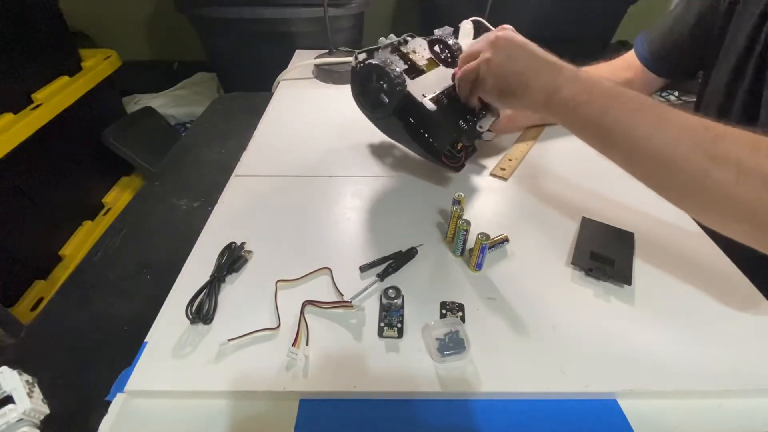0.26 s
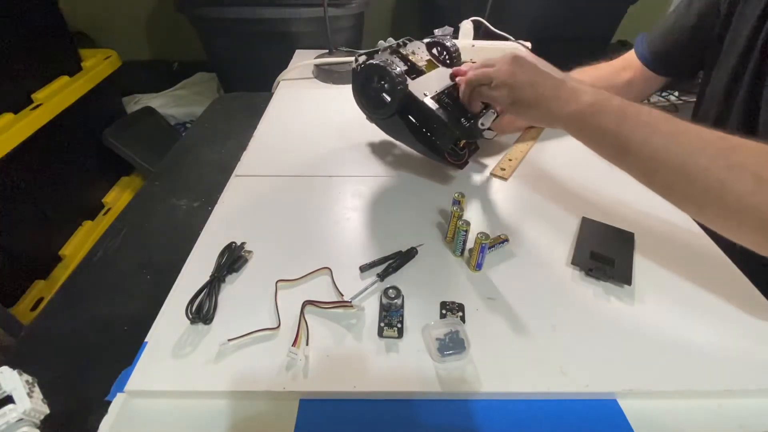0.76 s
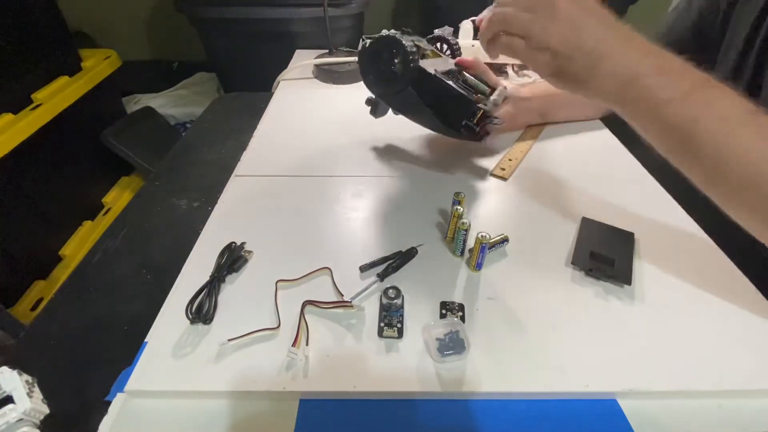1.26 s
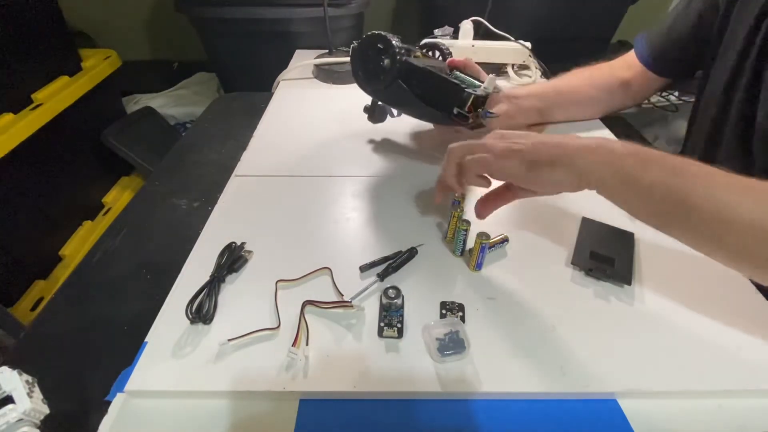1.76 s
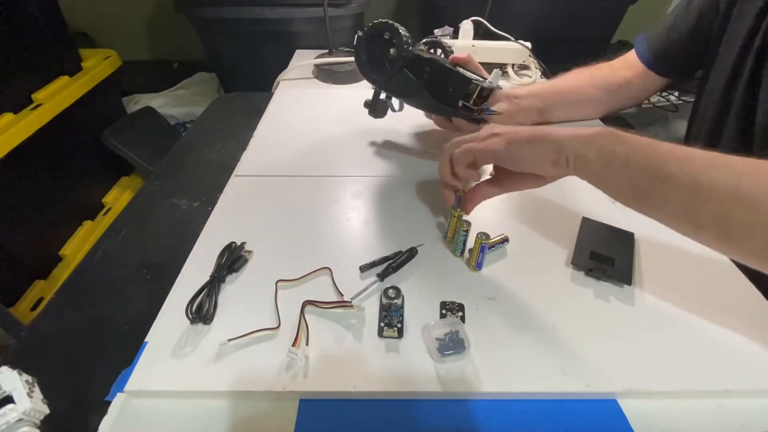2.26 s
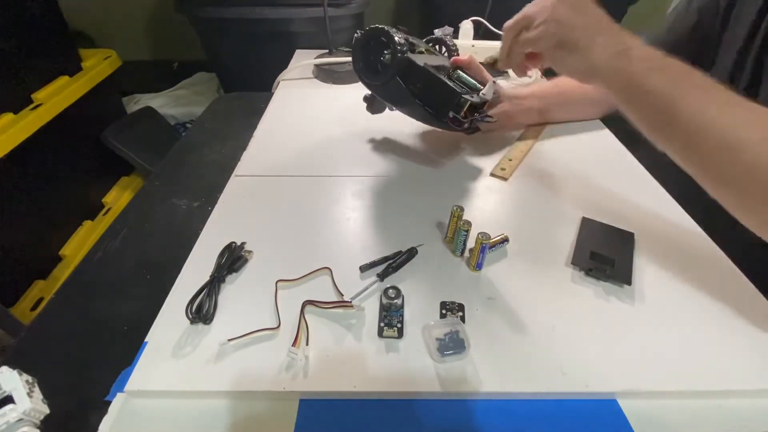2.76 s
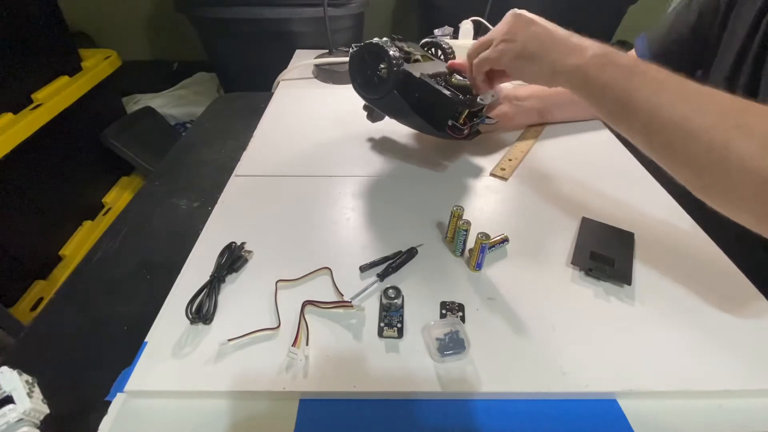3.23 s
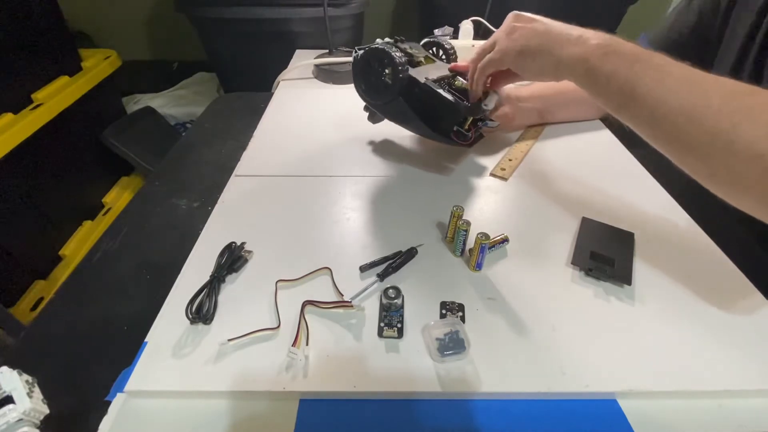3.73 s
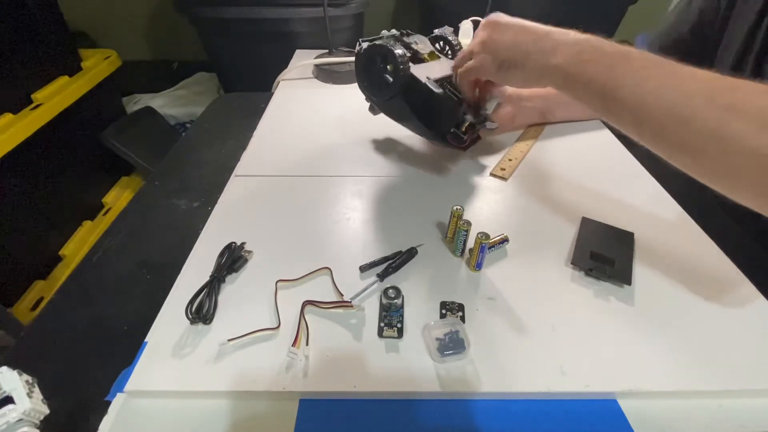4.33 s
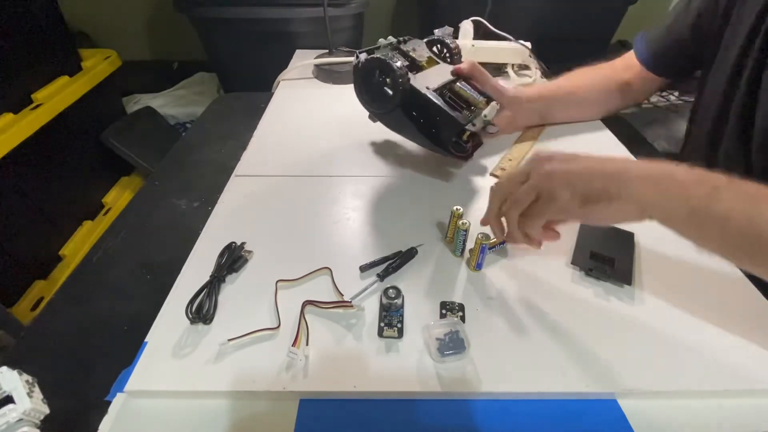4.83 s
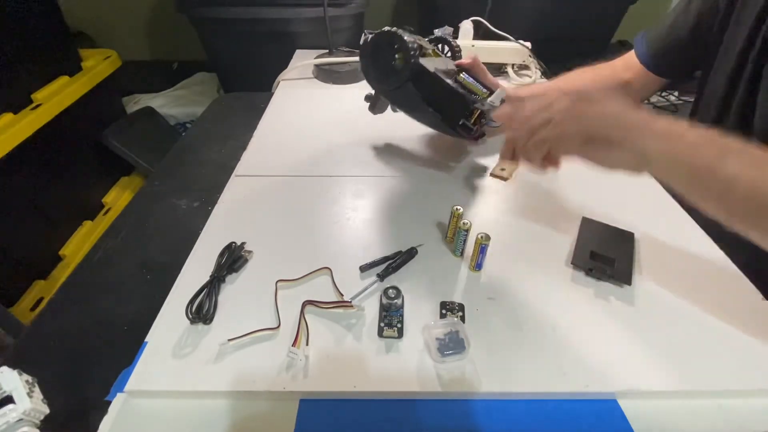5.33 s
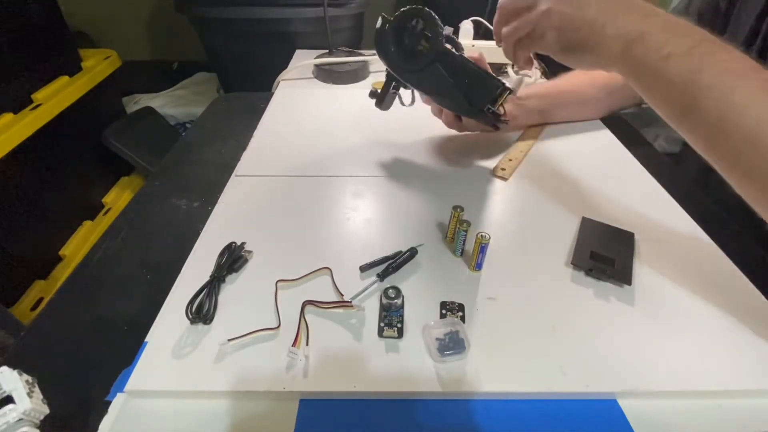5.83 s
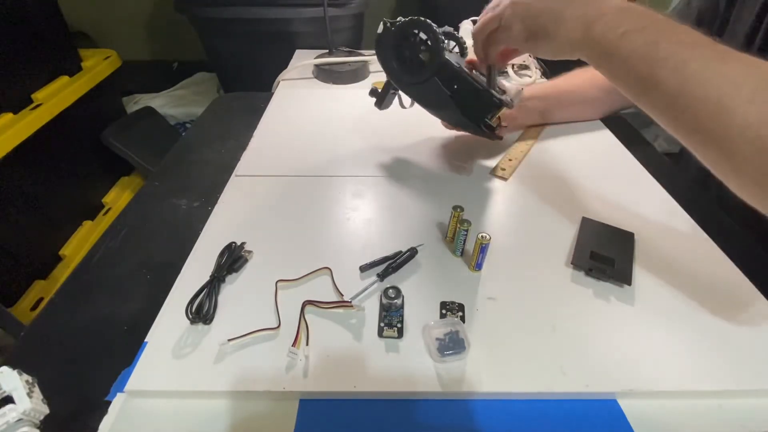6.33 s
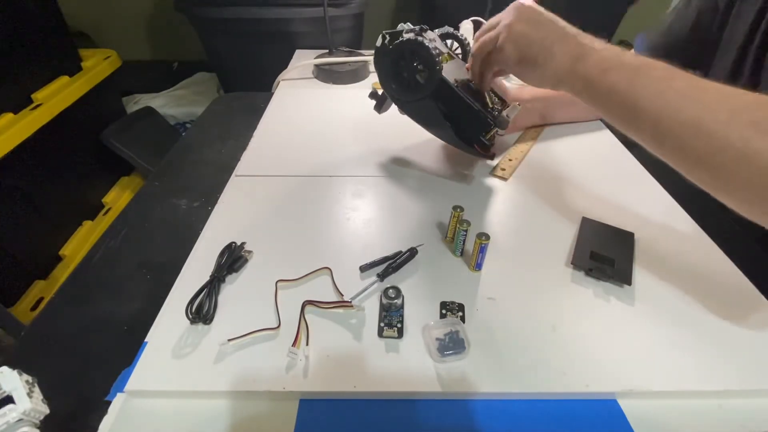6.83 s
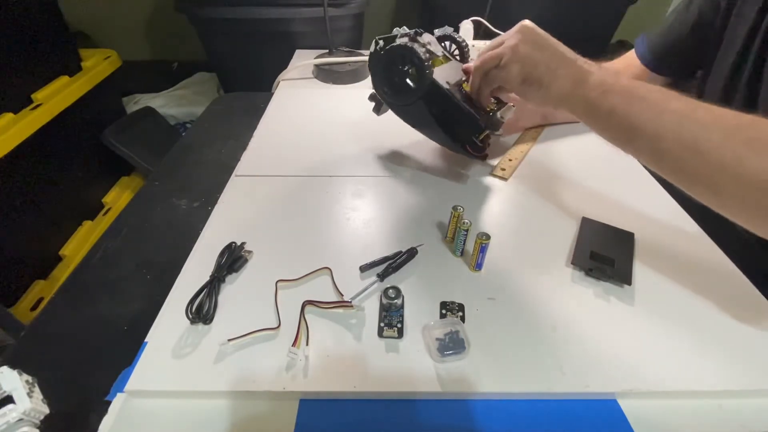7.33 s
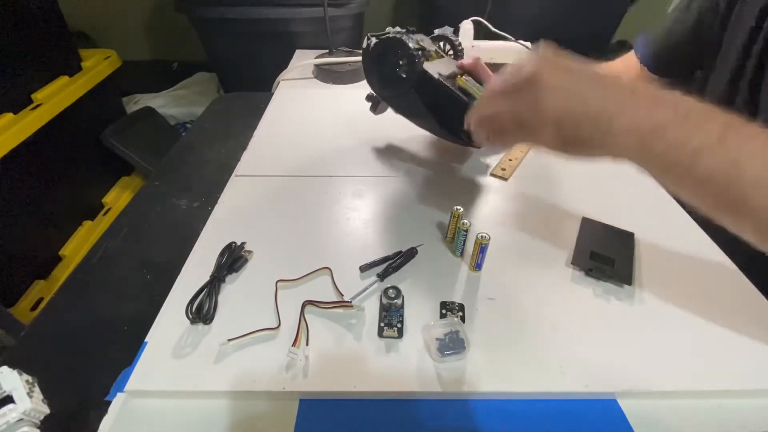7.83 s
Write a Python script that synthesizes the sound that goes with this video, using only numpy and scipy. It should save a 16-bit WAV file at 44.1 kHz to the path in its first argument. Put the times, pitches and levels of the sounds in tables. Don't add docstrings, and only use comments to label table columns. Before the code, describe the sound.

Batteries snap sharply into a small plastic robot shell in uneven bursts, over a steady low compressor hum and faint night insects.

```python
import sys
import numpy as np
from scipy import signal
from scipy.fft import rfft, irfft, next_fast_len
from scipy.io import wavfile
from scipy.ndimage import uniform_filter1d

SR = 44100
rng = np.random.default_rng(int(sys.argv[2]) if len(sys.argv) > 2 else 0)


def master(y):
    cut = np.clip(np.atleast_2d(y).T, -1, 1)
    pcm = np.round(cut * 32767)
    wavfile.write(sys.argv[1], SR, pcm.astype(np.int16))


def nominal_scale(level):
    x = np.asarray(level, float) / 20
    return 10 ** x


N = 356621
T = np.arange(N) / SR


def curve(table, hz):
    f, v = np.transpose(table)
    return np.interp(np.log(np.maximum(hz, 1)), np.log(np.maximum(f, 1)), v)


def level(x, db):
    return x * nominal_scale(db) / np.sqrt(np.mean(x ** 2))


def spread(x, pan_db):
    return np.array([x * nominal_scale(pan_db / 2), x * nominal_scale(-pan_db / 2)])


def add(out, x, s):
    i = int(s * SR)
    out[..., i:i + x.shape[-1]] += x[..., :N - i]


def noise(gain):
    size = next_fast_len(N)
    hz = np.arange(size // 2 + 1) * SR / size
    return irfft(rfft(rng.standard_normal(size)) * gain(hz), size)[:N]


def walk(rate, size=N):
    k = int(SR / rate)
    held = np.repeat(rng.standard_normal(size // k + 1), k)
    return 1.24 * uniform_filter1d(uniform_filter1d(held, k), k)[:size]


def causal(db):
    c = irfft(db * np.log(10) / 20)
    c[1:len(c) // 2] *= 2
    c[len(c) // 2 + 1:] = 0
    return irfft(np.exp(rfft(c)))


def ring(hz, t60, t):
    return np.sin(2 * np.pi * hz * t) * np.exp(-np.log(1000) * t / t60)


def knocks(table, rise_cycles, grip=1, grip_db=0):
    out, t = np.zeros(N), np.arange(SR // 3) / SR
    for s, db, hz, t60 in table:
        swell = 1 - np.exp(-t * hz / rise_cycles)
        add(out, nominal_scale(db + grip_db) * ring(hz, t60 * grip, t) * swell, s)
    return out


def air():
    # (frequency [Hz], level [dB per Hz])
    air_spectrum = [(15, -42.5), (25, -17), (44, -11.5), (74, -19.5), (102, -11), (123, -9.5), (145, -17),
                    (170, -12.5), (427, -17.5), (775, -26.5), (1130, -24), (1940, -31), (3720, -37),
                    (5570, -49.5), (16000, -73)]
    # (frequency [Hz], left minus right [dB])
    air_pan = [(60, 3), (110, 1), (200, -3), (380, -4), (700, 0), (1290, 5), (2380, 2.5), (4400, 10.5),
               (8120, 3), (15000, -3.5)]
    out, swell = 0, walk(0.66)
    for mid_hz in 25 * 2 ** np.arange(0, 9.6, .5):
        def band(hz):
            octaves_off = np.clip(np.log2((hz + 1) / mid_hz), -.5, .5)
            return nominal_scale(curve(air_spectrum, hz)) * np.cos(np.pi * octaves_off)
        common, left, right = (noise(band) for _ in range(3))
        alike = np.clip(150 / mid_hz - .2, 0, .6)
        pair = np.sqrt(alike) * common + np.sqrt(1 - alike) * np.array([left, right])
        drift = nominal_scale(1.0 * swell + 0.44 * walk(16))
        out = out + pair * spread(drift, curve(air_pan, mid_hz))
    return level(out, -56)


def hum_tone(phase, db, pan_db, lead):
    pair = np.array([nominal_scale(pan_db / 2) * np.sin(phase + lead), nominal_scale(-pan_db / 2) * np.sin(phase)])
    return np.sqrt(2) * nominal_scale(db) * pair


def compressor():
    shaft_hz, mains_hz, wobble_hz = 58.74, 120.0, 1.8
    # (multiple of shaft speed, rms level [dB], left minus right [dB], left leads by [rad])
    shaft_tones = [(1, -55.5, 8, -0.62), (2, -78.5, -1, 0), (3, -75.5, -3.5, .3), (5, -77, -6.5, .5),
                   (6, -77, -1.5, 0.3), (7, -72.5, 1.5, .5)]
    # (time [s], frequency [Hz], level [dB])
    pipe_whine = [
        (0, 268.2, -63),
        (1.501, 272.1, -70),
        (3, 274, -77),
        (6, 270.5, -72.5),
        (8.1, 269, -66.5),
    ]
    load = np.sin(2 * np.pi * wobble_hz * T)
    out = hum_tone(2 * np.pi * mains_hz * T + .12 * load, -47, -1, -0.13) * (1 + .06 * load)
    for k, db, pan_db, lead in shaft_tones:
        unsteady_db = db + 0.15 * k * walk(4.9)
        out += hum_tone(2 * np.pi * k * shaft_hz * T + k, unsteady_db, pan_db, lead)
    s, hz, db = np.transpose(pipe_whine)
    whine_phase = 2 * np.pi * np.cumsum(np.interp(T, s, hz)) / SR
    return out + hum_tone(whine_phase, np.interp(T, s, db) + 2 * walk(12), -5.0, 1.0)


def katydid():
    # (time of second stroke [s], level [dB], accent on third stroke [dB])
    phrases = [
        (0.2377, -59.5, 4.5),
        (1.224, -63.5, 7.5),
        (2.196, -59, -0.5),
        (3.231, -58, 0.5),
        (4.1544, -58, -1),
        (5.073, -60, 3),
        (6.0196, -58, -2.5),
        (7.015, -56.5, -1.5),
        (7.9815, -60, 0.5),
    ]
    # (time after second stroke [s], level [dB], share of the accent)
    phrase_strokes = [
        (-.047, -5, 0),
        (0, 2, 0),
        (.065, 2.5, 1),
        (.149, 2, .4),
    ]
    stroke_hz, scatter_db = 4250, -0.3
    out, t = np.zeros(N), np.arange(2048) / SR
    for s, phrase_db, accent_db in phrases:
        for after, more_db, share in phrase_strokes:
            if s + after >= T[-1]:
                continue
            pitch_luck, level_luck = rng.standard_normal(2)
            hz = stroke_hz * (1 + 0.01 * pitch_luck)
            db = phrase_db + more_db + share * accent_db + scatter_db * level_luck
            phase = 2 * np.pi * np.cumsum(hz * (1.03 - 2.8 * t)) / SR
            stroke = np.sin(phase) * np.sin(np.pi * np.clip(t / .026, 0, 1)) ** 2
            add(out, nominal_scale(db - 7) * stroke, s + after - .009)
    echo = level(noise(lambda hz: hz), -27)[:9000] * np.exp(-T[:9000] / 0.097)
    return out + signal.fftconvolve(out, echo)[:N]


def cricket():
    # (time [s], rms level [dB])
    trills = [(.12, -73), (.55, -77), (0.979, -78.5), (1.42, -74.5), (1.84, -76), (2.26, -74), (2.71, -75),
              (3.16, -71.5), (3.63, -81), (4.14, -74), (4.6, -75.5), (5.04, -74), (5.501, -76),
              (5.96, -75.5), (6.41, -72), (6.84, -70.5), (7.28, -76), (7.71, -76)]
    loudness, t = np.zeros(N), T[:SR // 3]
    for s, db in trills:
        swell = np.clip(t / .02, 0, 1)
        fade = np.exp(-np.maximum(t - .16, 0) / 0.037)
        add(loudness, nominal_scale(db) * swell * fade, s)
    song = level(noise(lambda hz: np.exp(-((hz - 3230) / 230) ** 2)), 0)
    flutter = 1 + 0.28 * np.sin(2 * np.pi * 45 * T)
    return song * loudness * flutter


def insects():
    chorus = level(noise(lambda hz: np.exp(-((hz - 3806) / 45) ** 2)), -82.5) * nominal_scale(0.83 * walk(2))
    return spread(katydid(), 10.2) + spread(cricket(), 4) + spread(chorus, 4)


def drag(width=0.4):
    start_s, length_s, mid_hz, drag_db = 4.35, 1.1, 337, -62.5
    out, size = np.zeros(N), int(length_s * SR)
    rumble = noise(lambda hz: np.exp(-(np.log((hz + 1) / mid_hz) / width) ** 2))
    rumble = rumble * nominal_scale(2.1 * walk(14.4))
    add(out, level(rumble[:size], drag_db) * np.hanning(size) ** .5, start_s)
    return out


def slides(split_hz=7300, ridge_hz=6100, ridge_db=3.5):
    # (time [s], length [s], fine hiss [dB], fade over the slide [dB], rub over hiss [dB])
    slide_moves = [(0.0, .05, -78.5, -23, 15.5), (0.057, .06, -80, -18, -5),
                   (0.461, 0.019, -78, 16.5, 15.5), (0.83, 0.0082, -84, 35, 6), (2.88, 0.045, -79.5, -5, 6),
                   (2.936, 0.1, -78.5, 8, 6.5), (3.477, 0.12, -85, -12.5, 6), (3.848, 0.026, -80, -3, 9),
                   (3.888, 0.01, -73.5, 3.5, 15), (3.714, 0.011, -61, 3, 15),
                   (4.441, 0.094, -75, -4.5, -17), (4.551, 0.67, -72.5, -13, 0.5),
                   (5.355, 0.053, -79, -12, 1), (6.35, .07, -89, -19, 3), (6.47, .03, -83.5, -6, 9),
                   (7.21, 0.026, -81, 14.5, 10), (7.37, 0.078, -79.5, 2, 7), (7.474, .19, -73, -20, 3.5),
                   (7.684, 0.26, -88, 7, 2.5)]
    # (frequency [Hz], level [dB per Hz])
    skin_spectrum = [(880, -24), (1500, 0), (1890, -15), (2210, 3.5), (2900, -10.5), (3200, -5.5),
                     (3990, -5), (6070, -3), (8350, -11), (10200, -4), (11200, -7), (12200, -29),
                     (13000, -15), (14500, -9.5), (16300, -51.5)]
    lift_db_per_s = -260

    def is_fine(hz):
        return (hz > split_hz) & (hz < 12000)

    def rub_gain(hz):
        ridge = ridge_db * np.exp(-((hz - ridge_hz) / 200) ** 2)
        return nominal_scale(curve(skin_spectrum, hz) + ridge) * ~is_fine(hz)

    fine, coarse = np.zeros((2, N))
    for s, length, db, fade_db, rub_db in slide_moves:
        t = T[:int((length + .2) * SR)]
        moving_db = db + fade_db * np.minimum(t / length, 1)
        press = nominal_scale(moving_db + lift_db_per_s * np.maximum(t - length, 0))
        add(fine, press, s)
        add(coarse, press * nominal_scale(rub_db), s)
    hiss = level(noise(lambda hz: nominal_scale(curve(skin_spectrum, hz)) * is_fine(hz)), 0)
    rub = level(noise(rub_gain), 2.5)
    soft_fine, soft_coarse = uniform_filter1d([fine, coarse], size=661, axis=1)
    uneven = nominal_scale(1.0 * walk(45) + 1.8 * walk(17))
    return spread((soft_fine * hiss + soft_coarse * rub) * uneven, 2.2)


def table_knocks():
    # (time [s], peak level [dB], frequency [Hz], 60 dB decay [s])
    dull_knocks = [(4.445, -54, 256, 0.065), (4.445, -59, 670, 0.03), (4.581, -61, 332, 0.3),
                   (4.96, -53, 481, 0.034), (5.119, -52.5, 472, 0.056), (5.121, -53, 920, 0.07),
                   (5.133, -57, 934, 0.072), (5.126, -66, 1140, .03), (4.971, -60.5, 1020, 0.089),
                   (6.859, -66, 59.7, 0.21), (7.031, -44, 62.2, 0.19), (7.22, -46, 47.3, 0.22),
                   (7.28, -40, 52, 0.27)]
    return spread(knocks(dull_knocks, 0.21), 2.5)


def squeaks(width=0.02):
    # (time [s], length [s], frequency [Hz], level [dB])
    narrow_squeaks = [(3.03, .08, 5370, -63), (3.022, .045, 2520, -63), (3.04, .06, 7000, -73),
                      (5.10, .06, 2420, -74), (1.95, .04, 5700, -83), (2.26, .06, 6550, -87),
                      (.822, .02, 6400, -65), (4.56, .4, 6100, -80), (2.866, .05, 2450, -58),
                      (2.866, .04, 3450, -63), (6.41, .04, 2300, -66), (6.465, .04, 2300, -67)]
    out = np.zeros(N)
    for s, length, mid_hz, db in narrow_squeaks:
        size = int(length * SR)
        rasp = noise(lambda hz: np.exp(-((hz / mid_hz - 1) / width) ** 2))[:size]
        add(out, level(rasp, db) * np.hanning(size) ** .5, s)
    return out


def contact(peak_db, body_db, metal_db, free_hz, chatter_ms, shell_db=-21, loudest_db=5):
    # (frequency [Hz], level [dB per Hz])
    crack_spectrum = [(150, -41), (250, -5), (560, -4.5), (950, -2), (1550, -5), (2040, -7.5), (2600, -2.5),
                      (3150, -6), (3690, -6), (4710, -7.5), (6120, -5), (7170, -11), (11100, -13),
                      (11900, -23), (13900, -11), (15500, -18.5), (16300, -46)]
    # (frequency [Hz], level [dB], 60 dB decay [s])
    shell_modes = [(442, -6, 0.013), (627.5, -6.5, 0.016), (890, -8.5, 0.02), (1160, -6, 0.09),
                   (1422, -4, 0.04), (1590, -15, 0.012), (1710, -2, 0.022), (2280, -18, .03),
                   (2335, -3, 0.021), (2500, -7.5, 0.041), (2660, -16, 0.017), (3080, -4, 0.0022),
                   (3330, -9.5, 0.075), (3390, -11.5, 0.031), (4280, -15.5, 0.023), (4750, -8.5, 0.042),
                   (5200, -9.5, .025), (5720, -16, .015), (6570, -10.5, 0.019), (7100, -9.5, 0.013)]
    t, hz = np.arange(4096) / SR, np.arange(2049) * SR / 4096
    f, db, t60 = (c[:, None] for c in np.transpose(shell_modes))
    t60 = np.minimum(t60, 50 / f + .008)

    chatter_s = np.clip(chatter_ms, .5, -1.2 - .35 * peak_db) / 1000
    u = t[:1024] / chatter_s
    luck = rng.standard_normal(1024)
    blows = luck * np.abs(luck)
    blows = rfft(blows * np.minimum(u * 1.1, 1) * np.exp(-u), 4096)
    patchy_db = 14 * np.log10(np.abs(blows) + 1e-3)
    blows = irfft(blows / rfft(causal(patchy_db)))
    blows = blows / np.sqrt(np.sum(blows ** 2))

    tilt = [(800, body_db + 7.5), (2500, 0.00072), (8000, metal_db + 12.5), (14000, 1.6 * metal_db + 25.5)]

    def held_db(at):
        free = np.exp(-(np.log((at + 1) / free_hz) / .2) ** 2)
        return curve(tilt, at) + loudest_db * free

    grip_db = 3 * rng.standard_normal(f.shape)
    drift = .02 * rng.standard_normal(f.shape)
    body = np.sum(nominal_scale(db + held_db(f) + grip_db) * ring(f * (1 + drift), t60, t), axis=0)
    crack = causal(curve(crack_spectrum, hz) + held_db(hz))
    hit = nominal_scale(shell_db) * body + crack / np.abs(crack).max()
    hit = hit * nominal_scale(peak_db - 4.5) / np.sqrt(np.sum(hit ** 2)) * 4
    no_bass = signal.butter(4, 480, "high", fs=SR, output="sos")
    return signal.sosfilt(no_bass, signal.fftconvolve(blows, hit))


def ringing_parts():
    # (time [s], peak level [dB], frequency [Hz], 60 dB decay [s])
    part_rings = [(0.470, -31, 2640, .04), (0.471, -23, 3600, 0.032), (0.472, -29, 1086, .05),
                  (0.478, -32, 2340, .04), (0.642, -45, 2220, 0.033), (0.643, -44, 3400, .04),
                  (0.842, -16, 1700, 0.037), (0.848, -24, 1570, 0.053), (0.842, -24, 2216, 0.066),
                  (0.842, -21, 1394, 0.057), (0.842, -19, 2660, 0.039), (0.842, -23, 3650, 0.035),
                  (0.850, -30, 3220, .04), (2.864, -46, 4700, 0.024), (2.864, -48, 3520, 0.055),
                  (2.864, -40.5, 1150, 0.052), (2.994, -56, 3400, 0.036), (3.118, -39, 2220, 0.035),
                  (3.118, -38, 5360, .04), (3.128, -36, 1950, .06), (3.729, -23, 2580, .03),
                  (3.729, -25, 1870, .05), (3.729, -28, 4670, .04), (3.736, -24.5, 1120, 0.041),
                  (3.742, -31, 2350, 0.035), (3.900, -36, 2380, .035), (3.902, -36, 3350, .05),
                  (4.300, -53, 4680, .03), (4.304, -54, 3230, .04), (6.246, -43.5, 3350, .05),
                  (6.253, -41, 1000, 0.055), (6.286, -32.5, 3330, .05), (6.288, -50, 5450, .05),
                  (6.292, -34.5, 953, 0.056), (6.319, -44, 3280, .03), (6.522, -44, 2250, .05),
                  (6.654, -43, 3290, 0.053), (7.237, -27.5, 1710, 0.044), (7.237, -26, 2920, 0.023),
                  (7.238, -31, 1135, .05), (7.238, -29, 5100, .025), (7.244, -30, 4280, 0.035),
                  (7.238, -28.5, 755, 0.051), (0.843, -24, 1080, 0.052)]
    return knocks(part_rings, 1.1, grip=0.61)


def bumps():
    # (time [s], strength [dB], metal brightness [dB], freest resonance [Hz], chatter [ms])
    case_bumps = [(0.0014, -39, -22, 1390, 4.3), (0.165, -28.5, -26, 1500, 4.7),
                  (1.9394, -47.5, -25, 1300, 3.8), (3.2928, -35, -15.5, 2400, 4.3),
                  (4.2965, -38, -18, 2600, 2.7), (4.304, -35.5, -18, 1000, 6.3),
                  (6.2446, -26.5, -23, 2580, 2.3), (6.2535, -33.5, -28, 2290, 3.5),
                  (5.128, -43, -32, 2420, 5), (6.9276, -32, -21, 990, 5), (7.0627, -33.5, -14, 2960, 4.2),
                  (7.4783, -35.5, -37, 2400, 4.3)]
    out = np.zeros(N)
    for s, db, metal_db, free_hz, chatter_ms in case_bumps:
        add(out, contact(db, -6.5, metal_db, free_hz, chatter_ms), s)
    return out


def ticks():
    # (time [s], strength [dB], metal brightness [dB], freest resonance [Hz], chatter [ms])
    spring_ticks = [(0.0574, -50, -5, 1880, 4), (0.116, -34, -18, 4780, 4), (2.863, -27, -31, 2430, 2.6),
                    (2.871, -33.5, -35, 2400, 4), (2.9394, -41.5, 6, 5300, 4),
                    (2.9935, -35.5, -11, 3330, 3), (3.0344, -38, -14, 5340, 4),
                    (3.499, -49.5, -14, 1060, 4.8), (6.2856, -19, -20, 2283, 2.03),
                    (6.2925, -29, -15, 2150, 4.2), (6.3182, -29, -23, 2250, 2), (6.4102, -40, -46, 2220, 5),
                    (6.4722, -43, -23, 2230, 4.3), (6.5124, -31, -16, 3360, 3),
                    (6.5212, -23, -15.5, 2340, 4), (6.5916, -32, -7, 5570, 4),
                    (6.6537, -25.5, -20.5, 3300, 2.5), (6.8083, -43.5, -34, 2360, 4),
                    (6.818, -46.5, -25, 2500, 5.4), (6.8308, -41, -24, 1070, 4),
                    (6.8418, -33.5, -25.5, 2760, 4.6)]
    out = np.zeros(N)
    for s, db, metal_db, free_hz, chatter_ms in spring_ticks:
        add(out, contact(db, -19, metal_db, free_hz, chatter_ms), s)
    return out


def snaps():
    # (time [s], strength [dB], body weight [dB], metal brightness [dB], freest resonance [Hz])
    seating_blows = [(0.4687, -10.5, -17.5, -18.5, 1850), (0.4711, -16, -15.5, -21, 2440),
                     (0.4776, -15.5, -5, -23, 2640), (0.4921, -22.5, -26.5, -24, 1670),
                     (0.6404, -23.5, -15, -20, 2120), (0.8405, -13, -22.5, -16.5, 1620),
                     (0.8418, -5, -22, -14, 1805), (0.849, -17.5, -14, -25.5, 1605),
                     (3.1162, -18.5, -12.5, -18, 2000), (3.125, -24, -13, -29, 1310),
                     (3.7099, -32, -25, -17, 2540), (3.7206, -23, -16, -25.5, 2410),
                     (3.7268, -9.5, -17, -17, 1760), (3.7353, -14, -18.5, -18.5, 2500),
                     (3.8983, -18.5, -23.5, -16, 1600), (3.9034, -18, -13, -25, 2527),
                     (7.234, -10.5, -4.5, -28, 2680), (7.2369, -9.5, -21.5, -19, 1710)]
    out = np.zeros(N)
    for s, db, body_db, metal_db, free_hz in seating_blows:
        add(out, contact(db, body_db, metal_db, free_hz, chatter_ms=3.2), s)
    return out


def contacts():
    port_lag_s = 1.75e-5
    robot = ringing_parts() + bumps() + ticks() + snaps()
    size = next_fast_len(N)
    hz = np.arange(size // 2 + 1) * SR / size
    late = irfft(rfft(robot, size) * np.exp(-2j * np.pi * hz * port_lag_s), size)[:N]
    return np.array([robot, late]) * spread(np.ones(1), 1.5)


def echoes(wet_db=-27, gap_s=0.00067, clump_db=8.5, clumps_s=0.015):
    # (frequency [Hz], 60 dB decay [s], level [dB])
    room_decay = [(300, 0.24, 6), (1000, 0.19, 0), (2980, 0.24, -2.5), (8100, 0.21, -2.5),
                  (15000, .17, -15)]
    t, tail = T[:SR // 2], np.zeros((2, SR // 2))
    hz = np.arange(len(t) // 2 + 1) * SR / len(t)
    common = rng.standard_normal(len(t))
    f, t60, db = np.transpose(room_decay)
    for mid_hz in 125 * 2 ** np.arange(8):
        octave = np.cos(np.pi / 2 * np.clip(np.log2((hz + 1) / mid_hz), -1, 1)) ** 2
        both_ears = .5 * common + rng.standard_normal((2, len(t)))
        band = irfft(octave * rfft(both_ears), len(t))
        clumps_db = clump_db * walk(300, size=len(t)) * np.exp(-t / clumps_s)
        fading_db = np.interp(mid_hz, f, db) - 60 * t / np.interp(mid_hz, f, t60)
        tail += band * nominal_scale(fading_db + clumps_db)
    tail *= nominal_scale(wet_db) * np.clip(t / gap_s, 0, 1)
    power = np.abs(rfft(tail)) ** 2
    smooth = uniform_filter1d(power.mean(axis=0), size=600)
    bumps_db = 10 * np.log10(uniform_filter1d(power, size=60) / smooth)
    flatten = [causal(-db)[:8192] for db in bumps_db]
    return signal.fftconvolve(tail, flatten, axes=1)


def room(x):
    turned_s = [0, .6, .78, 2, 3.6, 3.87, 5.8, 6.45, 7.15]
    out, edges = np.zeros((2, N)), [int(s * SR) for s in turned_s] + [N]
    mono = x.mean(axis=0)[None]
    for a, b in zip(edges, edges[1:]):
        add(out, signal.fftconvolve(mono[:, a:b], echoes(), axes=1), a / SR)
    return out


def scene():
    background = air() + compressor() + insects() + drag()
    near = slides() + table_knocks() + squeaks() + contacts()
    above_bass = signal.sosfilt(signal.butter(2, 150, "high", fs=SR, output="sos"), near)
    return background + near + room(above_bass)


def low_pass(x):
    return signal.sosfilt(signal.butter(12, 16450, fs=SR, output="sos"), x)


def record(dry):
    # (frequency [Hz], gain [dB])
    mic_response = [(20, -19), (40, -7), (55, 0), (11000, 1.5), (11500, -3.5), (12600, 2), (13100, 3),
                    (15200, -2), (16200, -4.5)]
    size = next_fast_len(N + SR)
    hz = np.arange(size // 2 + 1) * SR / size
    heard = irfft(rfft(dry, size) * nominal_scale(curve(mic_response, hz)), size)[:, :N]
    return low_pass(heard)


dry = scene()
out = record(dry)
master(out)
```